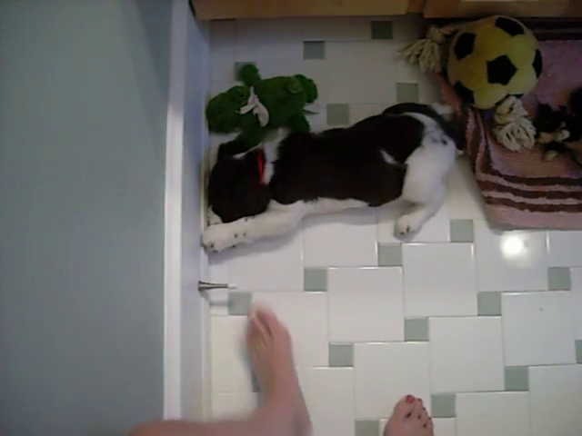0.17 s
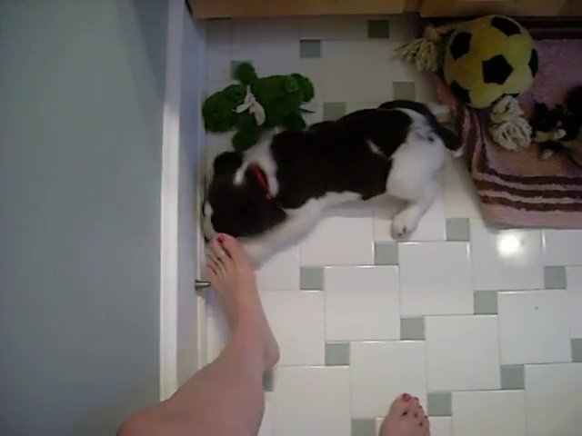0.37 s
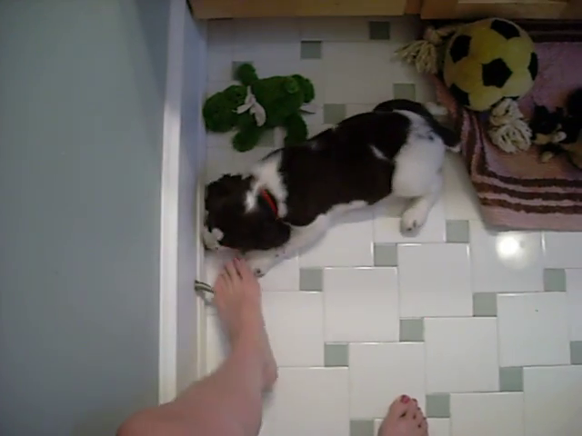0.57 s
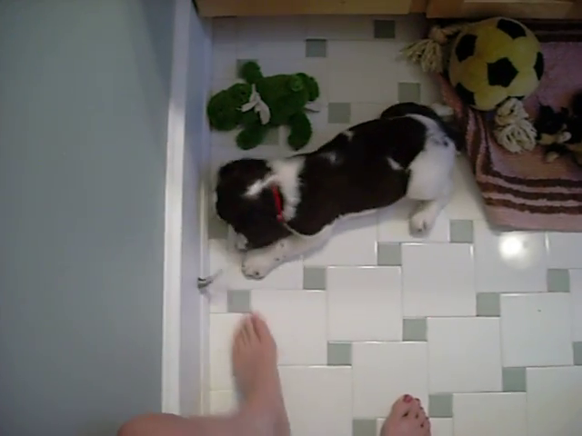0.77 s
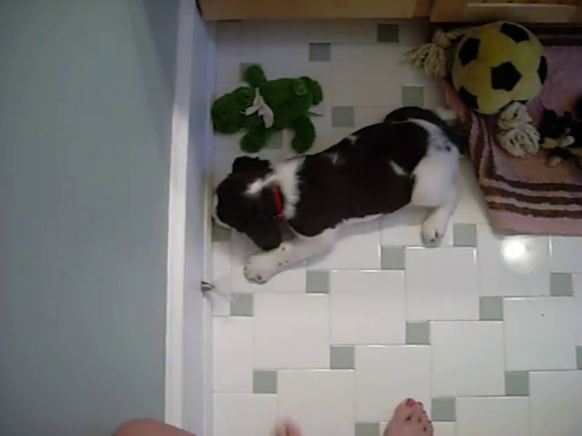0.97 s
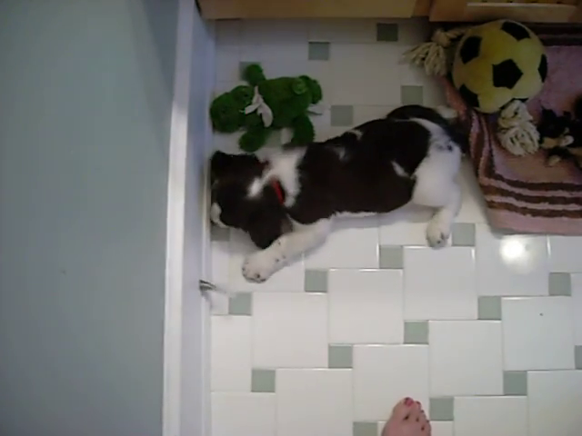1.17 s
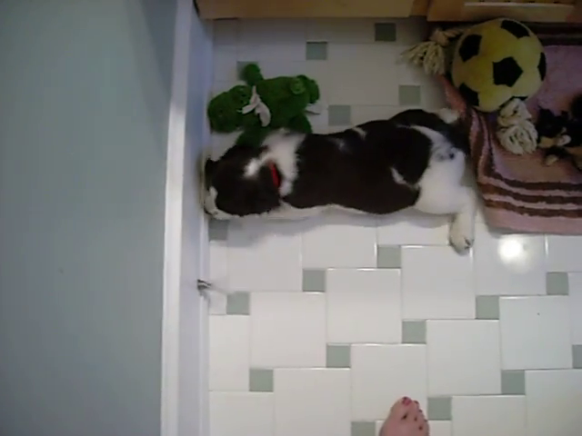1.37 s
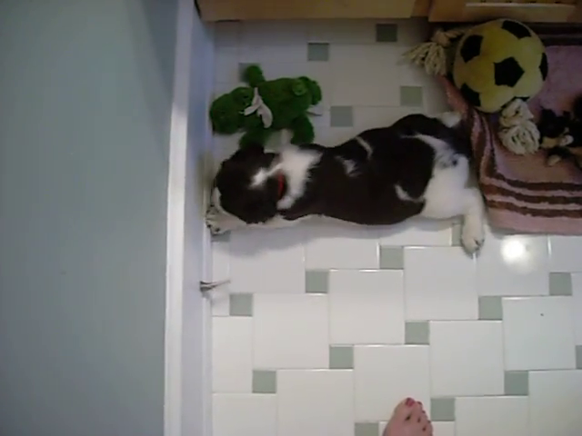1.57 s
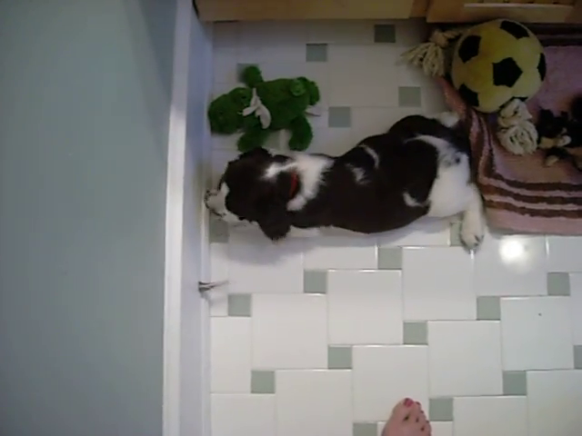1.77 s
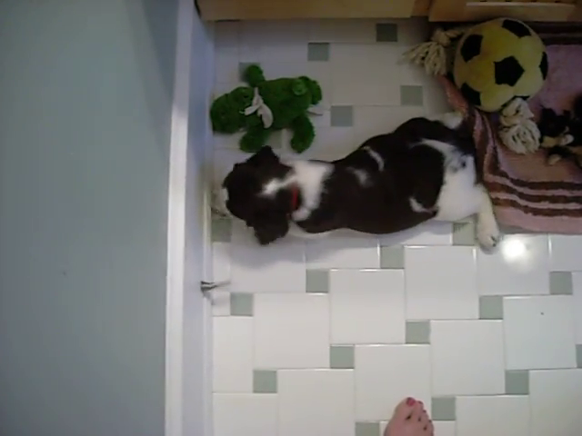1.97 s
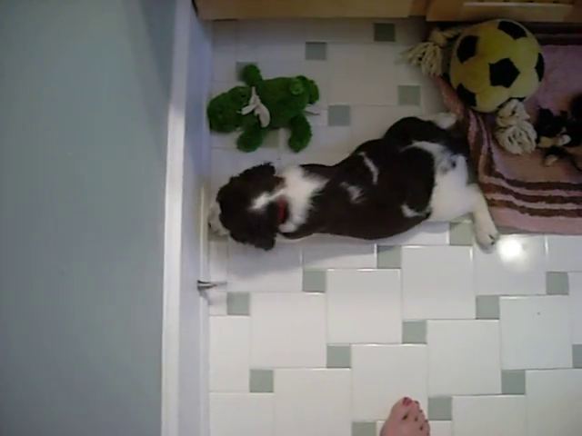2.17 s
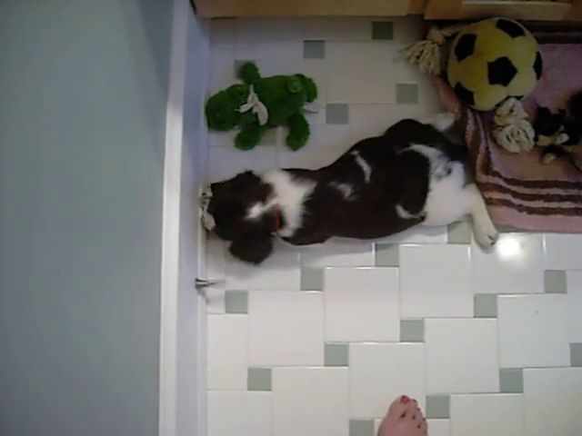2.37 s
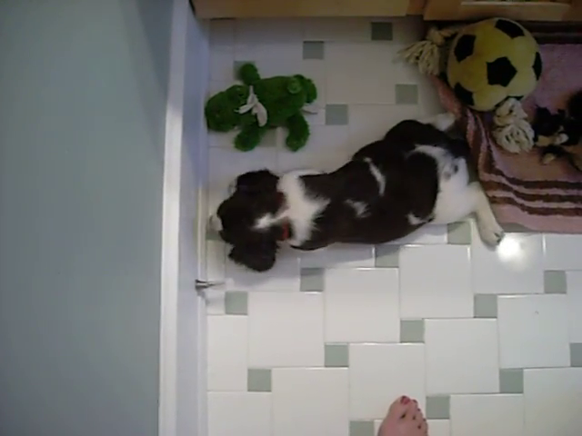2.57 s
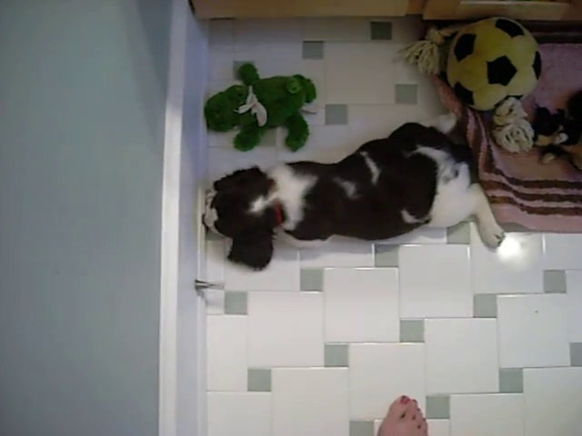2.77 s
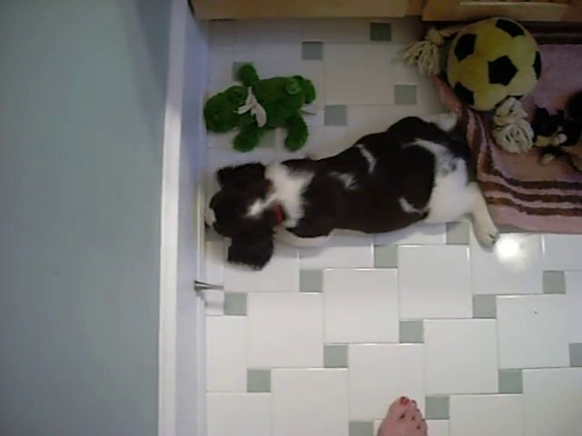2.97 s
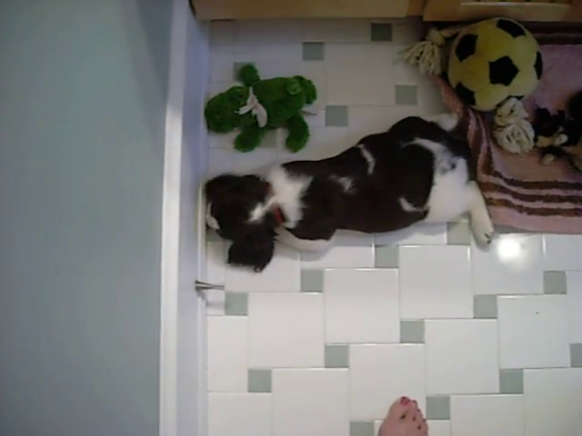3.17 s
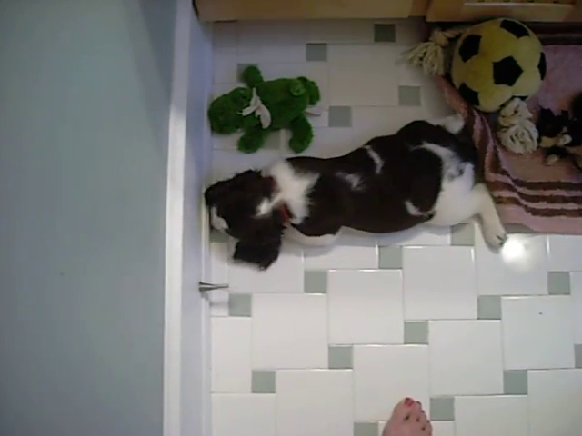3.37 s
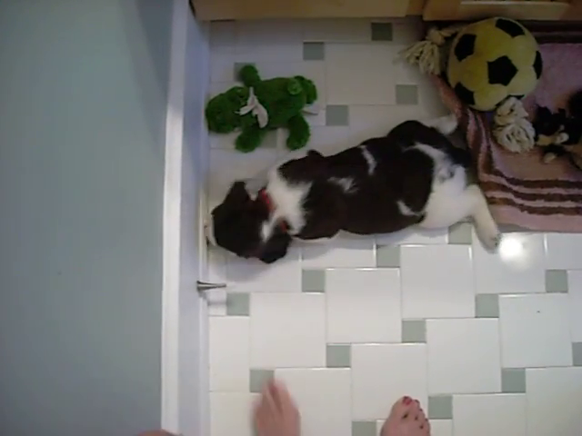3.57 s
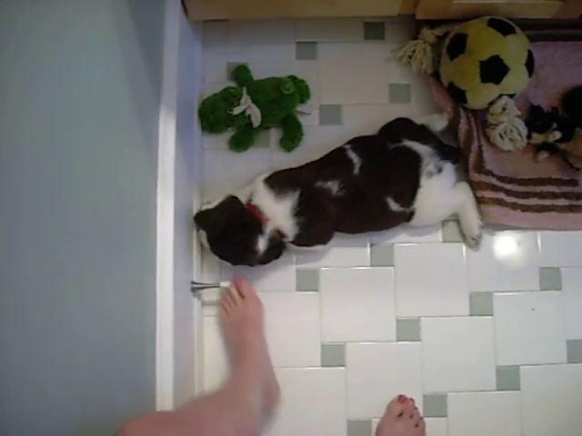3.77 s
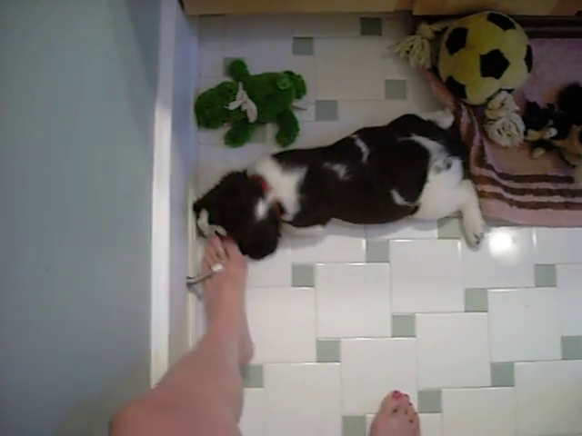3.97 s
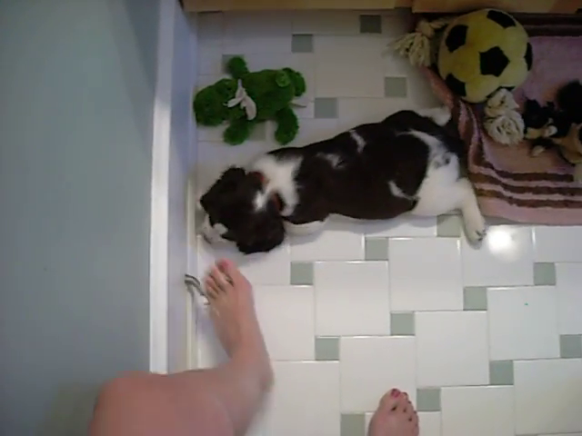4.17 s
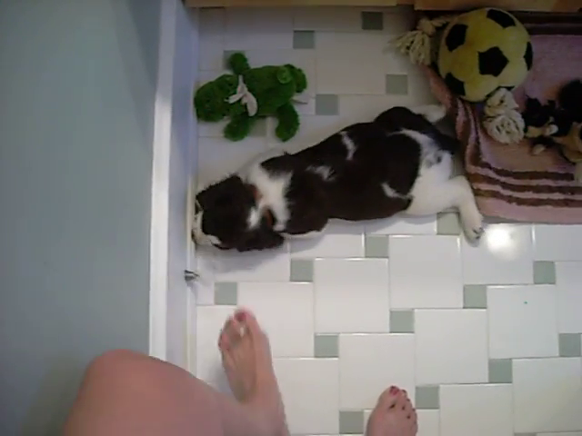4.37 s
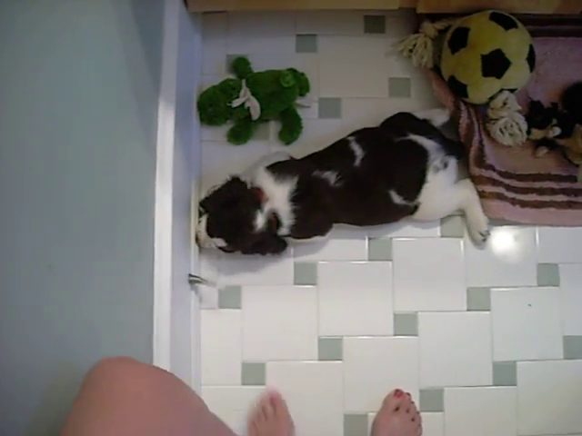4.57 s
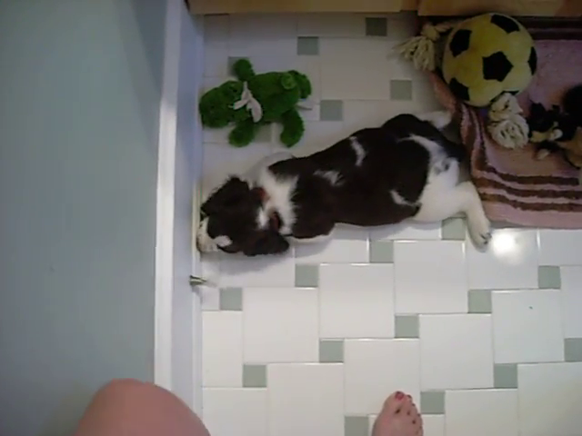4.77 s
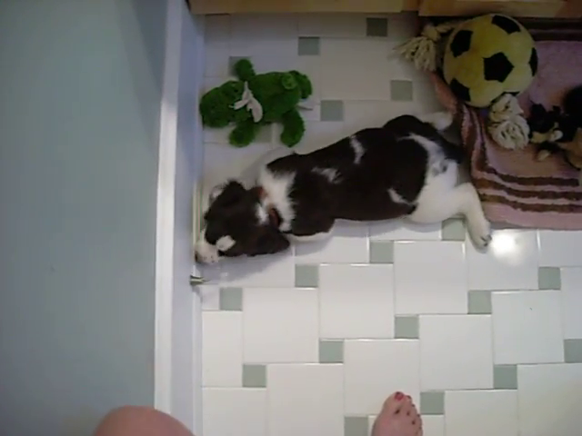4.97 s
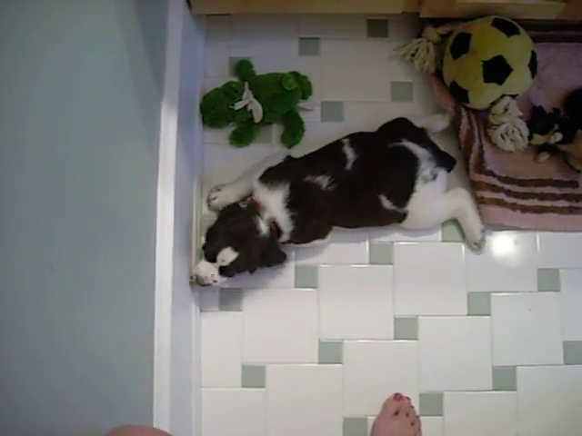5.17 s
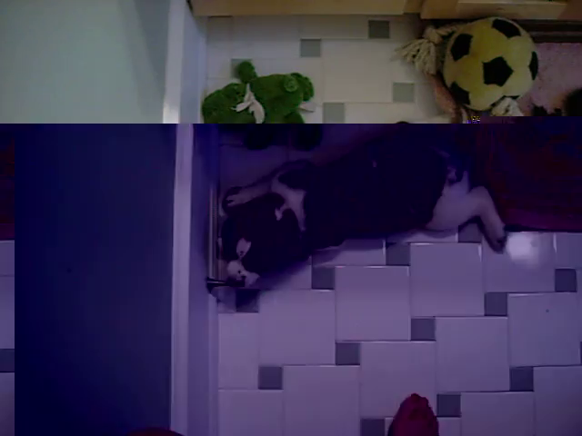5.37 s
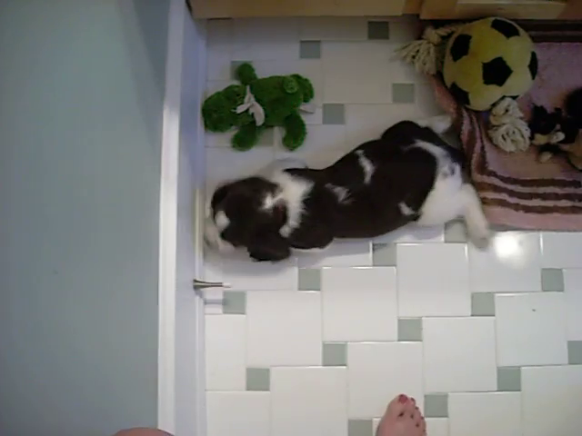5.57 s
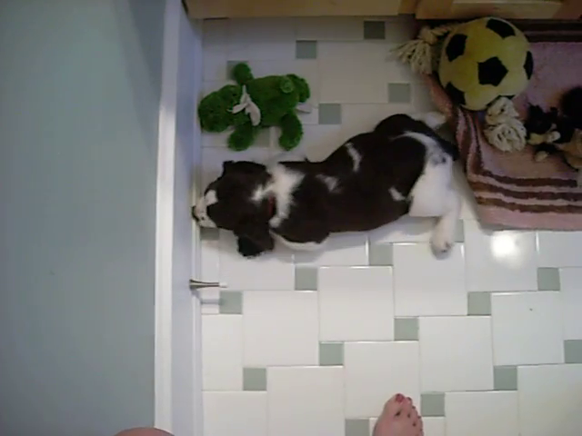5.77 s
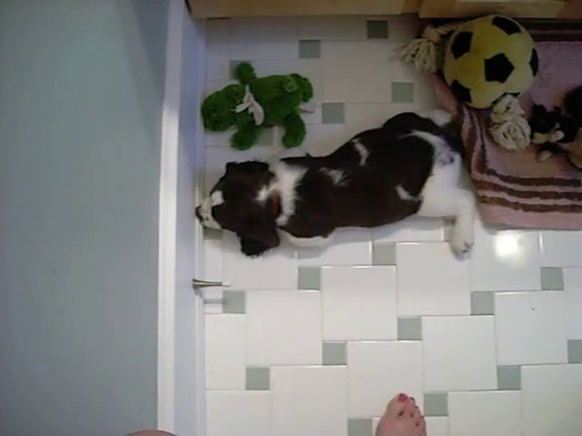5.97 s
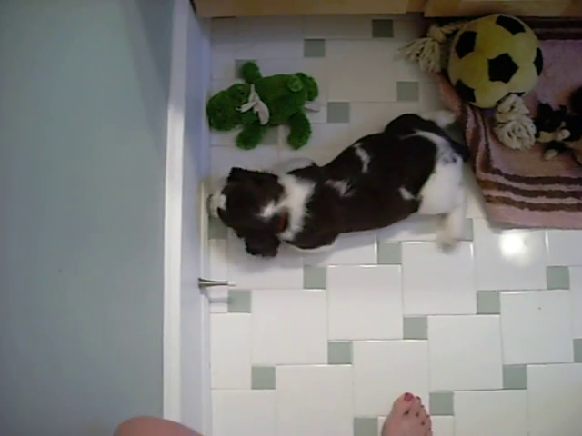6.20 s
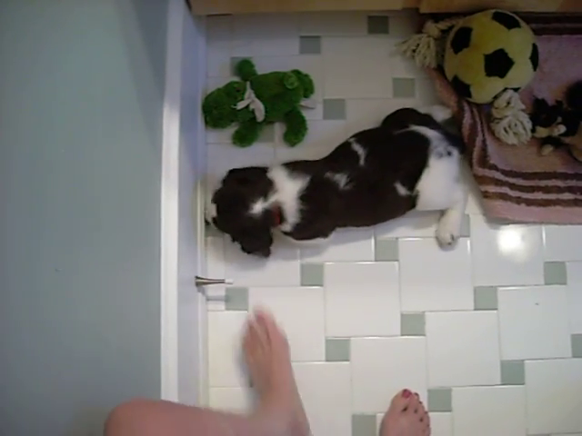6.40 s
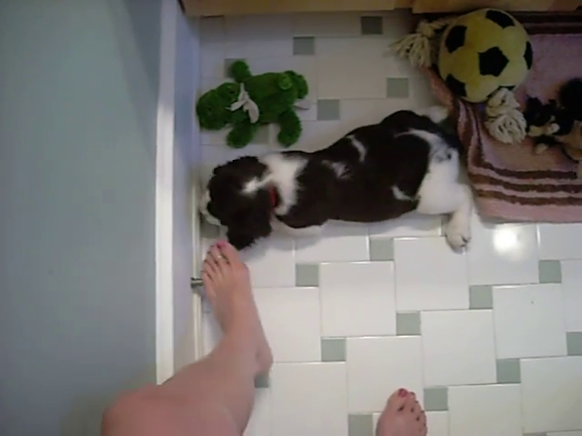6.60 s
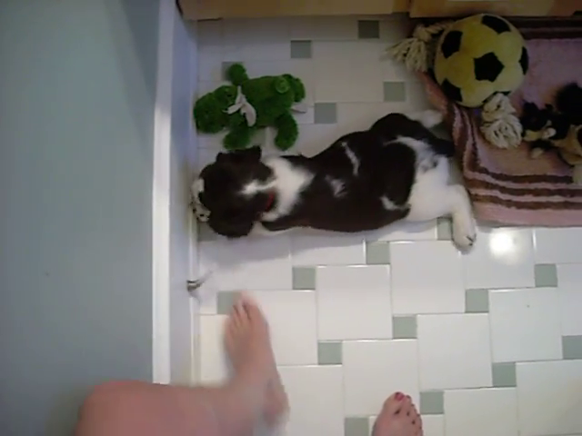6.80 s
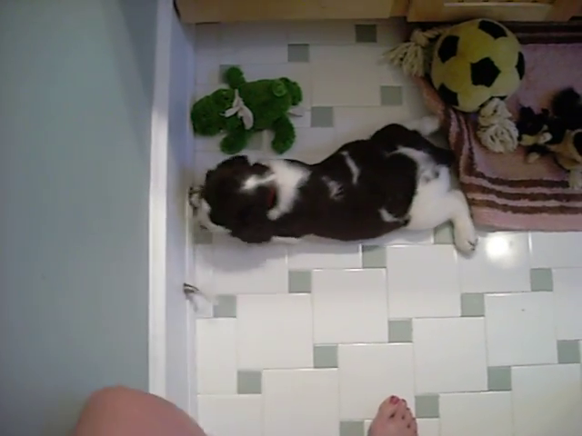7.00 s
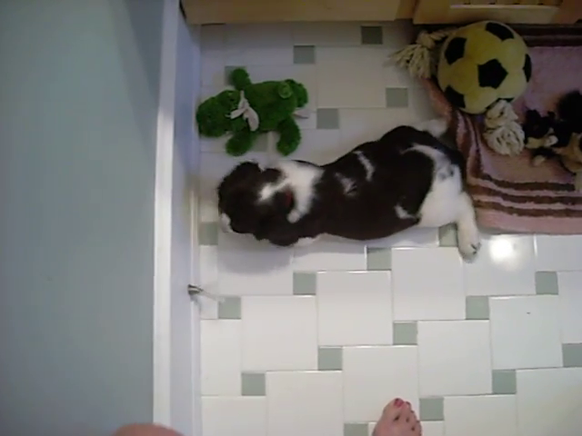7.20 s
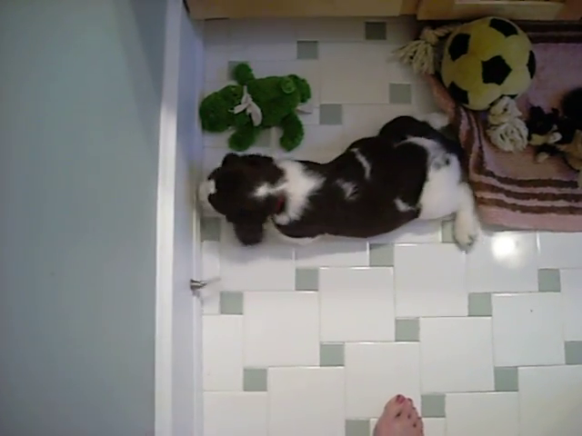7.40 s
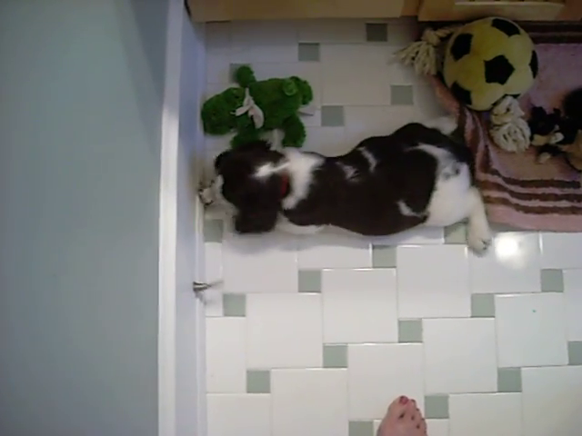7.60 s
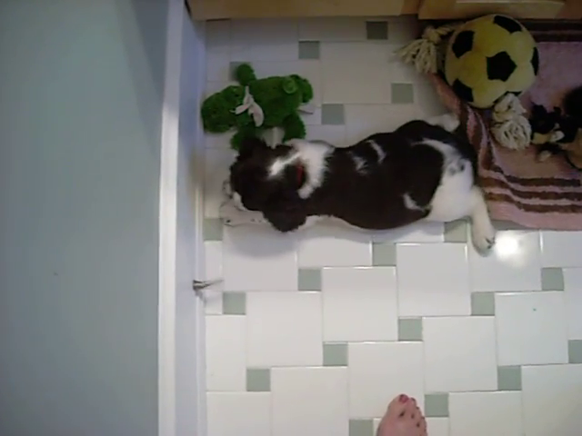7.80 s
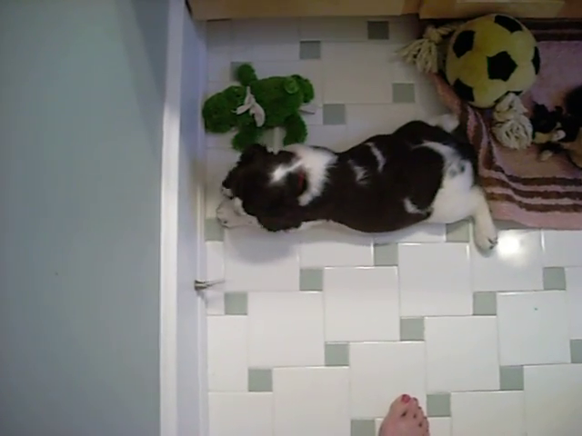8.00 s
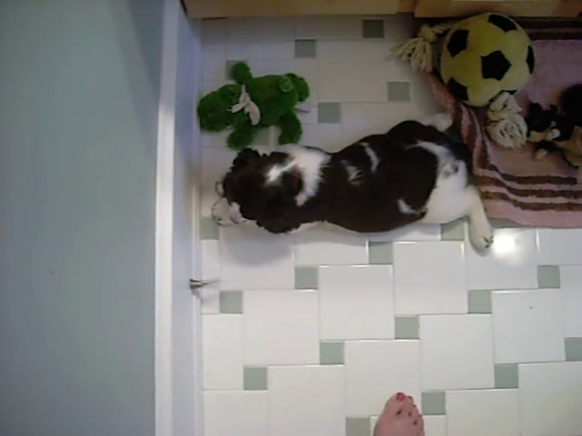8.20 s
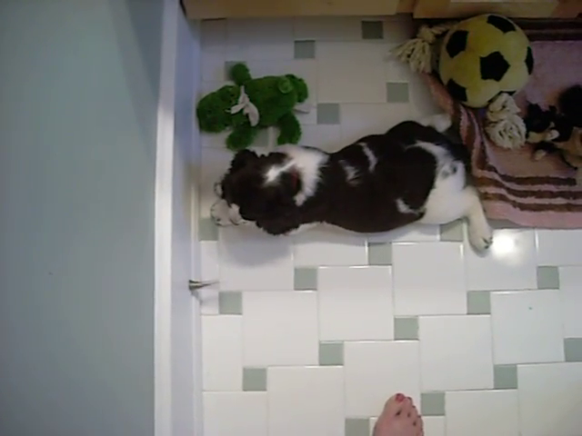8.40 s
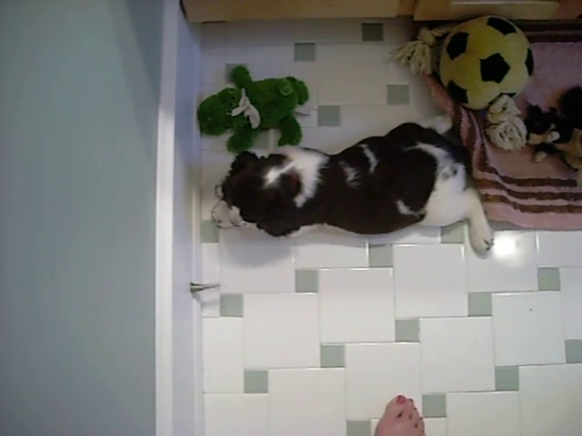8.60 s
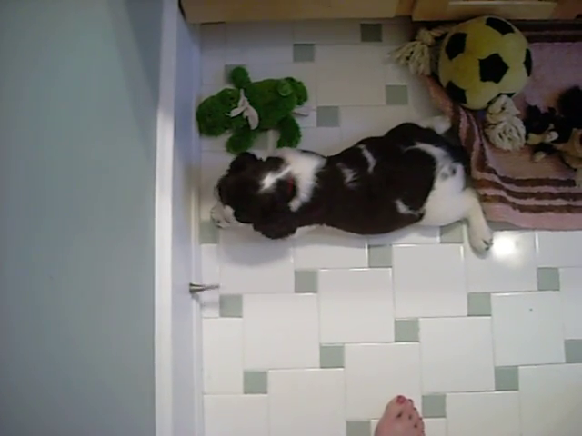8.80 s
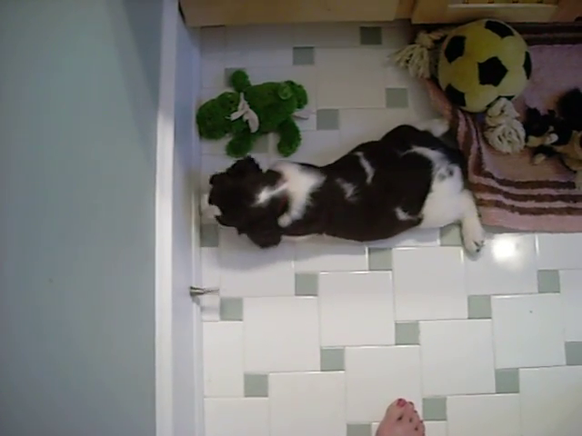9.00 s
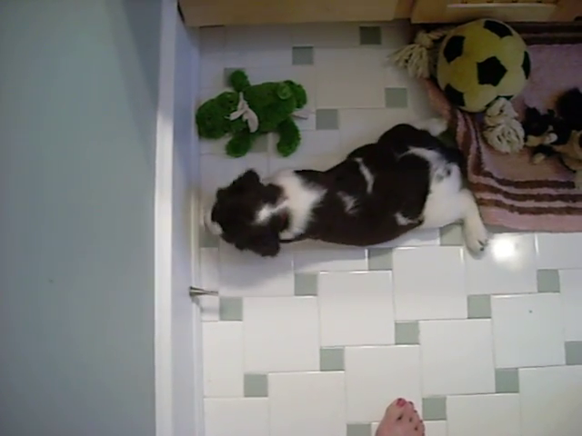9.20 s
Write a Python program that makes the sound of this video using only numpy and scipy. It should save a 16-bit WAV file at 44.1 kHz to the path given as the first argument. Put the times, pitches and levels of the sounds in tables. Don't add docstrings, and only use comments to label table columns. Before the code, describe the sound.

A bare foot flicks a coiled spring door stop three times, giving loud rattling buzzes that fade; puppy claws tick on tile in a small room.

```python
import sys
import numpy as np
from scipy import signal
from scipy.io import wavfile
from scipy.ndimage import uniform_filter1d

SR = 44100
rng = np.random.default_rng(int(sys.argv[2]) if len(sys.argv) > 2 else 0)


def unload_audio(sound):
    columns = np.transpose(np.atleast_2d(sound))
    steps = np.round(np.clip(columns, -1, 1) * 32767)
    wavfile.write(sys.argv[1], SR, steps.astype(np.int16))


def gain_from_decibels(decibels):
    exponent = np.asarray(decibels, float) / 20
    return 10 ** exponent


N = 407925


def twang(rows, swing, manner):
    # [f/Hz, width/Hz, level/dB]
    steel = [(1529, 400, -8), (1950, 265, -3), (2192, 314, 1.5), (2449, 553, 11.5), (2933.5, 465, 12),
             (3250, 285, 8), (3655.6, 275, 0), (4012, 53, -15.5), (4004, 220, -4.5)]
    # [f/Hz, width/Hz, level/dB]
    board_knock = [(619, 47, -10.5), (746, 72, -6.5), (808, 78, -8), (925, 102, 2), (1070, 79, -8),
                   (1350, 220, -7)]
    # [f/Hz, width/Hz, level/dB]
    cavity = [(385.3, 19.3, -8), (463.4, 60.3, 2.5), (542, 57, -8.5)]
    # [f/Hz, width/Hz, level/dB]
    board_boom = [(157.8, 14, -2), (184.3, 18, 0.5), (229.3, 13, -2), (250.3, 8.2, -0.5), (290.5, 16, -5.5),
                  (319, 20, -7.5)]
    # [most/dB, offset/dB, share of clap force, fade/dB per s, share of back clap]
    knock_law = (-17.5, -3, 1.04, 0.9, -0.23)
    hollow_law = (-27, -12, 0.75, 1, 0.4)
    boom_law = (-23.5, -13.5, .5, 2.08, 0.34)
    back_at = 0.52
    tight_db, loose_db = -35.5, -7.5
    knock_lag = SR // 600

    s, *columns = np.transpose(rows)
    t = np.arange(swing[0][0], s[-1], 1 / SR)
    age = t - t[0]
    clap_db, back_db = (np.interp(t, s, c) for c in columns)
    lead, loose, board_db, damping = manner
    knock_db = board_db + follow(knock_law, clap_db, back_db, age)
    hollow_db = board_db + follow(hollow_law, clap_db, back_db, age)
    boom_db = board_db + follow(boom_law, clap_db, back_db, age)

    turns = np.cumsum(np.interp(t, *np.transpose(swing))) / SR + lead * np.minimum(3 * age, 1)
    since_front, since_back = turns % 1, (turns - back_at) % 1
    luck = rng.standard_normal((100, 2))[turns.astype(int)].T
    volley = clap_volley(since_front) * gain_from_decibels(1.2 * luck[0])
    volley = volley + clap_volley(since_back) * gain_from_decibels(back_db + 1.2 * luck[1])

    looseness = np.clip((clap_db - tight_db) / (loose_db - tight_db), 0, 1)
    share = np.clip(loose * looseness ** 2, 0, 1)
    chatter = 0.81 + 1.9 * np.exp(-since_front / 0.19)
    hits = rng.standard_normal(len(t)) * (rng.random(len(t)) < 7000 / SR)
    drive = hits * ((1 - share) * evened(volley) + share * chatter)
    front = passing(turns, 0) * gain_from_decibels(0.41 * luck[0])
    back = passing(turns, back_at)

    overload_db = 1.05 * np.maximum(clap_db + 12, 0)
    coils = gain_from_decibels(clap_db + overload_db) * steady(ring(drive, steel, lag=0.001986))

    thuds = np.roll(front + 0.2 * gain_from_decibels(back_db) * back, knock_lag)
    knock = steady(ring(thuds + 0.016 * share * drive, board_knock, rise=0.0049))
    knock = gain_from_decibels(knock_db + overload_db) * knock

    hollow = steady(ring(front - 0.19 * back + 0.06 * share * drive, cavity, rise=0.005))
    hollow = gain_from_decibels(hollow_db + 1.7 * overload_db) * hollow

    thump = steady(ring(front - 0.25 * back + 0.049 * share * drive, board_boom, rise=0.0018))
    boom = gain_from_decibels(-11) * thump + gain_from_decibels(3.5) * steady(wire_hum(turns))
    boom = gain_from_decibels(boom_db + 0.3 * overload_db) * boom

    fade = np.minimum((s[-1] - t) / damping, 1)
    return t[0], np.array([coils + knock + hollow, boom]) * fade


def clap_volley(since):
    return since / 0.025 * np.exp(-since / 0.036) + 0.42 * np.exp(-since / 0.37)


def passing(turns, place):
    return np.diff(np.floor(turns - place), prepend=-1) > 0


def follow(law, clap_db, back_db, age):
    most_db, offset_db, share, fade, plane = law
    return np.minimum(most_db, offset_db + share * clap_db - fade * age + plane * back_db)


def wire_hum(turns):
    # [f/Hz, width/Hz, level/dB]
    passed = [(80, 20, -8), (120, 18, -12), (158, 26, -3), (181, 24, 1), (229, 18, 3), (256, 22, -1),
              (292, 16, -9), (318, 22, -6)]
    hz = np.arange(400.)
    k = np.arange(4, 18)[:, None]
    answer = sum(gain_from_decibels(db) / (1 + (2 * (hz - f) / width) ** 2) ** 2 for f, width, db in passed)
    rate = uniform_filter1d(np.gradient(turns) * SR, SR // 20)
    waves = np.sin(2 * np.pi * (k * turns + rng.random(k.shape)))
    return (np.interp(k * rate, hz, answer) * waves).sum(0)


def ring(x, modes, rise=0.00012, lag=0):
    body = np.zeros(SR // 8)
    for k, (hz, width, db) in enumerate(modes):
        late = lag * np.log2(modes[-1][0] / hz)
        t = np.maximum(np.arange(len(body)) / SR - late, 0)
        envelope = (1 - np.exp(-t / rise)) * np.exp(-np.pi * width * t)
        body += (-1) ** k * gain_from_decibels(db) * envelope * np.sin(2 * np.pi * hz * t)
    return signal.oaconvolve(x, body)[:len(x)]


def tick(s, db, hz, knock_db):
    t60 = np.array([[0.052], [0.071]])  # tile, floor, s
    t = np.arange(SR // 5) / SR
    puff = rng.standard_normal((2, len(t))) * gain_from_decibels(-60 * t / t60)
    high = ring(puff[0], [(0.67 * hz, 900, -6), (hz, 1200, 0)], rise=.0001)
    low = coloured(puff[1], [(120, -18), (300, 7.5), (900, 8.0), (1600, -3.5), (2500, -19.5), (4000, -38)])
    return s, gain_from_decibels(db) * high / abs(high).max() + gain_from_decibels(knock_db) * low / abs(low).max()


def step(s, db, hz, t60):
    t = np.arange(SR // 3) / SR
    tones = np.sin(2 * np.pi * hz * t)
    tones += .5 * np.sin(2 * np.pi * 1.3 * hz * t)
    tones += 0.62 * np.sin(2 * np.pi * 1.5 * hz * t)
    return s, gain_from_decibels(db - 60 * t / t60) * (1 - np.exp(-t / 0.0035)) * tones


def scuff(s, swell, release, db):
    # [f/Hz, level/dB]
    friction = [(120, -45.5), (200, -7), (632, -5.5), (710, -8.5), (908, 1), (1300, -11), (1730, -2.5),
                (3530, 1), (4400, -13.5), (5720, -54.5), (9680, -120)]
    ends_db = -24.5
    grains = rng.standard_normal(SR // 2) * (rng.random(SR // 2) < 12000 / SR)
    t = np.arange(-swell, release, 1 / SR)[:SR // 2]
    away = np.where(t < 0, t / swell, t / release)
    stroke = gain_from_decibels(db - 3.5 + ends_db * away ** 2) * signal.windows.tukey(len(t), .1)
    return s - swell, stroke * evened(coloured(grains, friction))[:len(t)]


def room(x):
    # [f/Hz, t60/s]
    decay = [(150, 0.63), (500, 0.69), (1500, 0.47), (4000, 0.24)]
    taps = np.zeros(SR // 2)
    at = np.arange(120, SR // 2 - 20, 20)
    taps[at + rng.integers(0, 20, len(at))] = rng.choice([-1., 1.], len(at))
    hz, t, z = signal.stft(taps, SR, nperseg=256)
    dying = gain_from_decibels(-60 * t / read(decay, hz)[:, None])
    tail = signal.istft(z * dying, SR, nperseg=256)[1]
    return signal.oaconvolve(x, tail / np.linalg.norm(tail))[:N]


def background():
    # [f/Hz, level/dB]
    hiss_colour = [(12, -44.5), (20, -11), (85, -13.5), (123, -2), (150, -17.5), (226, -7), (253, -20),
                   (407, -21.5), (436, -25.5), (986, -22), (1380, -31.5), (3670, -25.5), (4500, -48.5),
                   (5850, -85.5), (9900, -120)]
    # [f/Hz, width/Hz, level/dB]
    fan = [(119, 8, -73.5), (205, 12, -63), (286, 15, -43.5)]
    noise = rng.standard_normal((2 + len(fan), N))
    drift = evened(uniform_filter1d(uniform_filter1d(noise[0], 3000), 3000))
    mix = gain_from_decibels(-30.5 - 1.5 + 1.5 * drift) * evened(coloured(noise[1], hiss_colour))
    for n, (hz, width, db) in zip(noise[2:], fan):
        mix = mix + gain_from_decibels(db) * evened(ring(n, [(hz, width, 0)]))
    return mix


def evened(x):
    return x / np.sqrt(np.mean(x ** 2) + 1e-20)


def steady(x):
    power = uniform_filter1d(x ** 2, SR // 5, mode="reflect")
    return x / np.sqrt(power + 1e-9 * np.mean(x ** 2))


def read(points, hz):
    f, value = np.transpose(points)
    return np.interp(np.log(hz + 1), np.log(f + 1), value)


def coloured(x, points):
    gain = np.log(gain_from_decibels(read(points, abs(np.fft.fftfreq(8192, 1 / SR)))))
    taps = np.fft.ifft(np.exp(np.conj(signal.hilbert(gain)))).real[:2048]
    taps = taps.reshape((1,) * (x.ndim - 1) + (-1,))
    return signal.oaconvolve(x, taps, axes=-1)[..., :x.shape[-1]]


def add(mix, s, sound):
    part = mix[..., round(s * SR):][..., :sound.shape[-1]]
    part += sound[..., :part.shape[-1]]


def scene():
    # [t/s, clap level/dB, back against front clap level/dB]
    claps = [
        [(.765, -8, -2), (1.12, -9, -10.5), (1.2, -16, 6), (1.31, -19.5, 11), (1.65, -28, -4), (1.9, -28.5, -5),
         (2.75, -33, 3), (3.1, -40, -4.5), (3.85, -41.5, 4)],
        [(4.275, -4.5, -3), (4.45, -8.5, -5.5), (4.7, -12, -11.5), (4.82, -20, -6.5), (5.0, -27, -0.5),
         (5.1, -32, 5.5), (5.18, -35.5, 6.5), (5.27, -65, 1)],
        [(6.861, -6.5, 1), (7.22, -8, -0.5), (7.3, -15, -5.5), (7.37, -22.5, 7), (7.75, -26.5, -2),
         (8.0, -28, -7), (8.45, -31.5, 8.5), (8.85, -33.5, 2), (9.25, -40, 6.5)],
    ]
    # [t/s, swing rate/Hz]
    swings = [
        [(.765, 17.9), (1.113, 18.447), (1.461, 19.591), (1.809, 19.555), (2.156, 20.015), (2.504, 20.39),
         (2.852, 20.552), (3.9, 21)],
        [(4.275, 17.2), (4.6, 19.226), (4.925, 19.687), (5.35, 19.6)],
        [(6.861, 17.55), (7.259, 19.131), (7.657, 19.396), (8.056, 19.804), (8.454, 20.171), (8.852, 20.742),
         (9.25, 20.6)],
    ]
    # [thud lead/share of a swing, looseness/0-1, board level/dB, end damping/s]
    manners = [
        (.1, 0.9, 0, 0.045),
        (.08, .7, 2, 0.049),
        (.07, 1, -0.5, 0.016),
    ]
    # [t/s, peak level/dB, bright centre f/Hz, low knock level/dB]
    claws = [(0.0562, -21, 3080, -27), (0.128, -27.5, 3430, -35), (0.304, -22.5, 3570, -28.5),
             (0.443, -23.5, 3660, -34), (1.7195, -15.5, 2510, -43), (2.1318, -16, 2120, -38),
             (2.2223, -16.5, 2390, -40), (2.3465, -14.5, 3350, -27), (2.536, -17, 2160, -45),
             (2.8618, -17.5, 2370, -33), (2.9798, -15.5, 3080, -50), (3.2375, -18, 2320, -27),
             (3.882, -15.5, 3240, -22.5), (4.078, -19, 2000, -45), (5.1386, -15, 2960, -41),
             (5.294, -27, 2980, -44), (5.312, -24.5, 2860, -29.5), (6.5286, -23.5, 3050, -47),
             (6.5475, -22, 3030, -34), (6.626, -29, 2870, -48), (6.8162, -18, 3250, -24.5),
             (6.831, -13.5, 2760, -28.5)]
    # [t/s, peak level/dB, bright centre f/Hz, low knock level/dB]
    pads = [
        (1.7389, -11.5, 3250, -14.5),
        (2.148, -21, 1950, -22),
        (3.5021, -6.5, 3600, -21),
        (3.7968, -25, 2130, -23),
        (3.9066, -11, 3400, -17),
        (5.3974, -3, 3100, -7),
        (6.586, -37, 2570, -26),
    ]
    # [t/s, peak level/dB, f/Hz, t60/s]
    heel = [
        (3.9, -11.5, 174.3, 0.11),
    ]
    # [strongest t/s, swell/s, release/s, level/dB]
    strokes = [
        (.062, 0.029, .05, -37),
        (.154, 0.045, 0.02, -38),
        (.72, 0.16, 0.21, -28.5),
        (3.38, 0.15, 0.17, -25.5),
        (3.8, 0.019, 0.058, -36),
        (6.19, 0.068, .07, -39),
        (6.535, 0.018, .08, -47),
        (6.632, .015, 0.018, -41),
        (6.789, .14, .05, -49),
    ]
    # [f/Hz, level/dB]
    thin_board = [(40, -23), (100, -12), (150, -0.5)]

    spring, (small, slides) = np.zeros((2, 2, N))
    for flick in zip(claps, swings, manners):
        add(spring, *twang(*flick))
    high, boom = coloured(spring, thin_board)
    for row in claws + pads:
        add(small, *tick(*row))
    add(small, *step(*heel[0]))
    for row in strokes:
        add(slides, *scuff(*row))
    wet = room(gain_from_decibels(-8) * high + gain_from_decibels(-17) * boom + gain_from_decibels(-6.0) * small + gain_from_decibels(-0.5) * slides)
    return (high + boom + small + slides + wet)[None]


def low_pass(x):
    return signal.sosfilt(signal.butter(12, 17070, fs=SR, output="sos"), x)


def record(dry):
    # [f/Hz, level/dB]
    narrow = [(3400, 0.5), (3900, 0.5), (4300, -6), (4600, -40.5), (5000, -92)]
    # [f/Hz, level/dB]
    dulling = [(4000, -0.5), (5000, -6), (9000, -9), (12000, -10), (15800, -10), (16500, -46.5)]
    ceiling = 0.71
    heard = coloured(dry[0], narrow) + coloured(background(), [(4400, -5), (4700, -53)])
    clipped = coloured(np.clip(heard, -ceiling, ceiling), dulling)
    return low_pass(clipped[None])


dry = scene()
out = record(dry)
unload_audio(out)
```